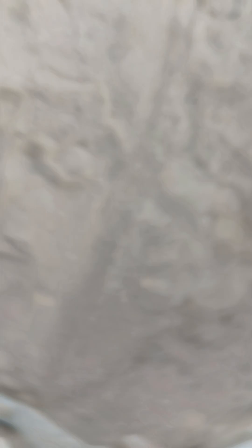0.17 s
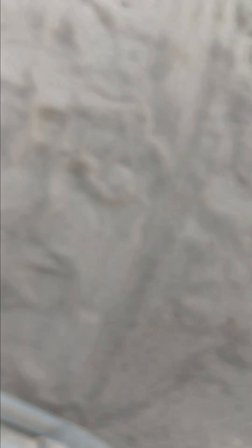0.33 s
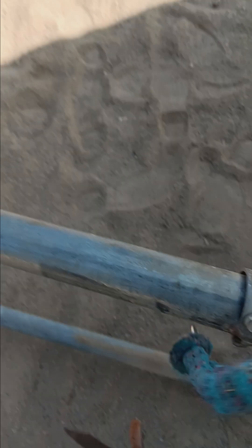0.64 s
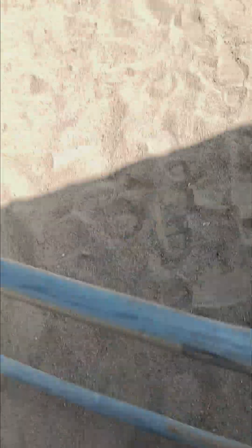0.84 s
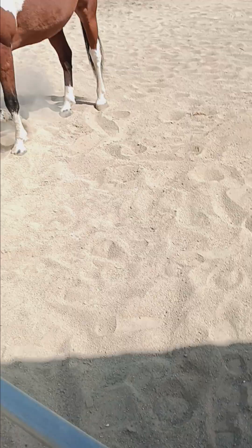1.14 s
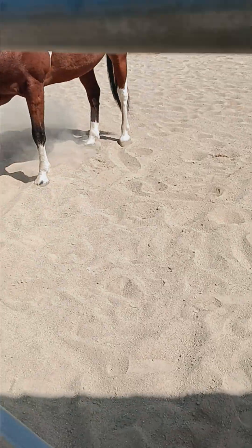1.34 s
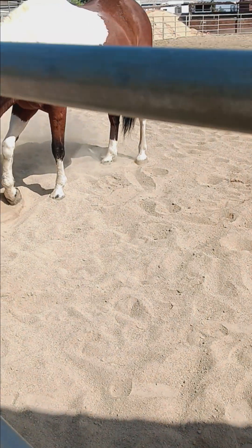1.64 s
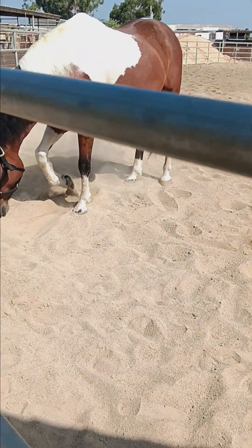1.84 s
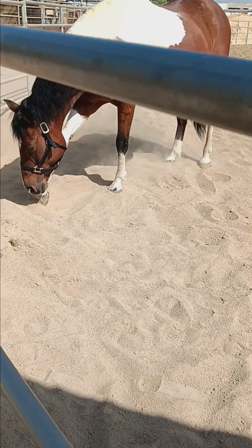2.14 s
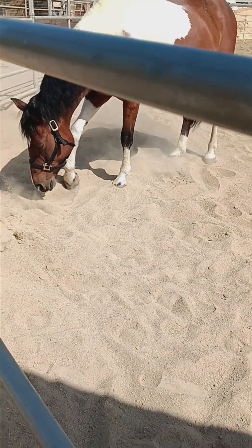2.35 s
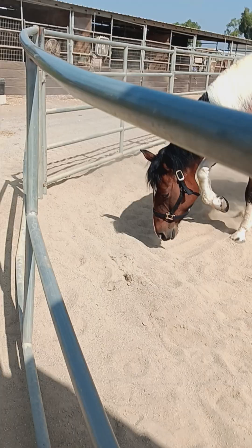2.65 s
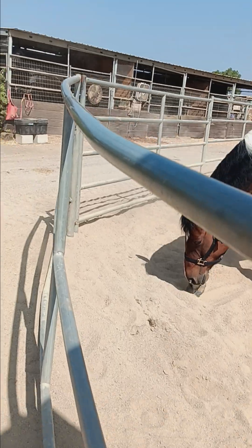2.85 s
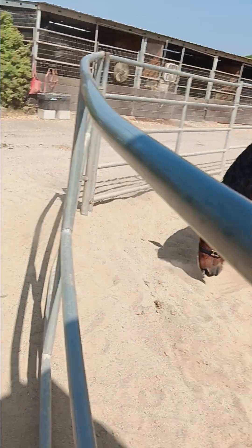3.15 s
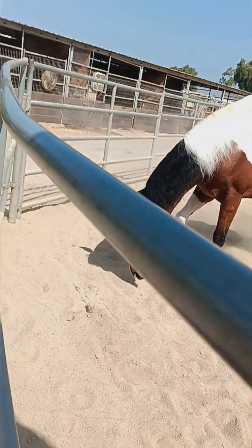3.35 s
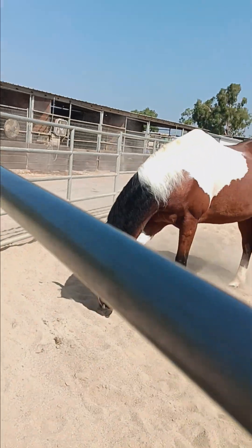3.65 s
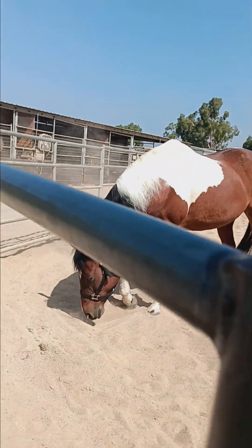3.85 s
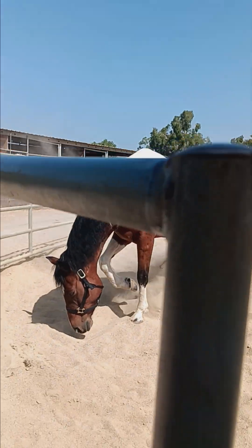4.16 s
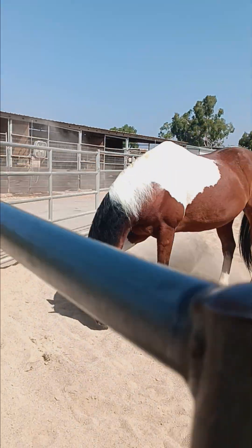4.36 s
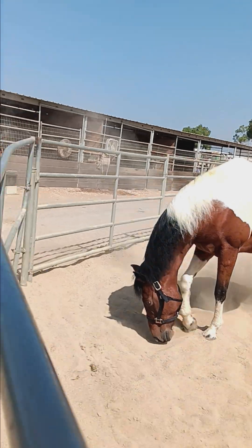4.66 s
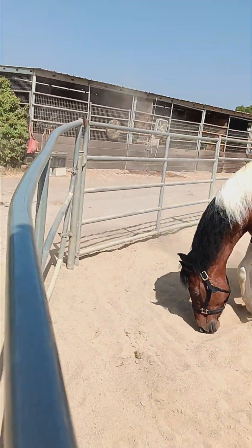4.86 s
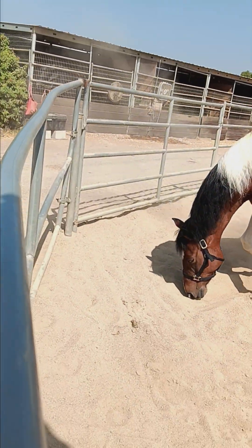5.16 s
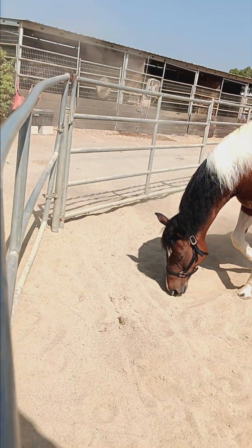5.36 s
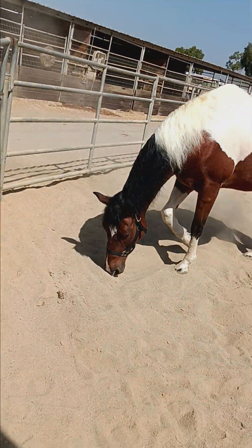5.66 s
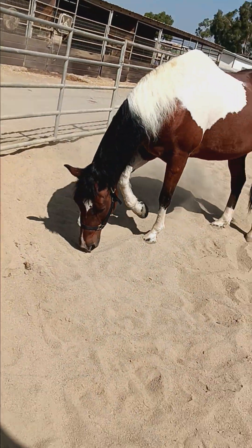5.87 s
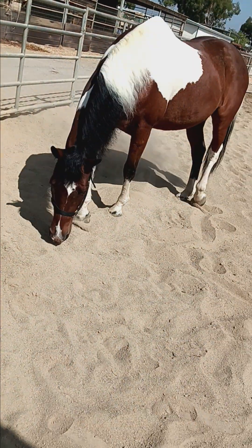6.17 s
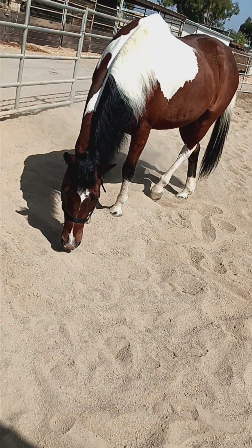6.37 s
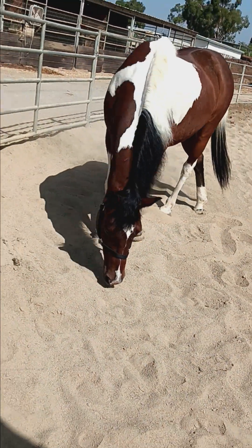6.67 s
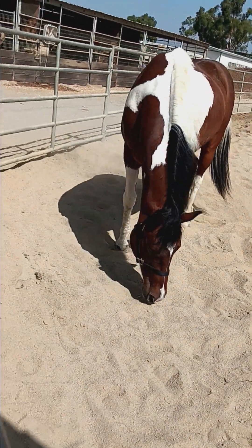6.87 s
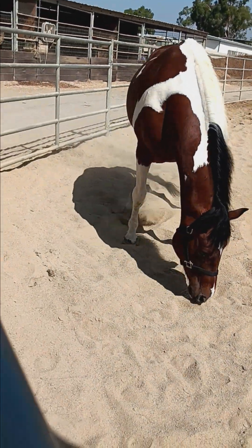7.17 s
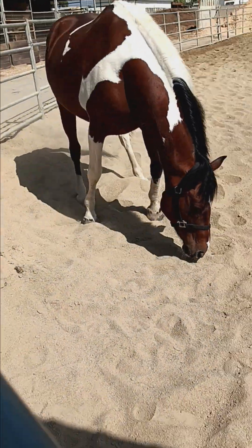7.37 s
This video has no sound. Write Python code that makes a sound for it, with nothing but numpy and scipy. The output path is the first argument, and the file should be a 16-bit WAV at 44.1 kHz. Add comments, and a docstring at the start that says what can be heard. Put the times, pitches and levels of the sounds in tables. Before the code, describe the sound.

A steel pipe gate and its latch clang sharply, then hands and feet scuff over sand before one huge ringing blow and a last clank.

```python
"""A steel pipe gate of a sand paddock clangs open: struck tubes and latch ring in modes, with a noisy clatter.
A snap hook pings as a caught sine, a low push goes with the heaviest blow; noise bursts tick, bump and fill out blows.
Hands and feet scuff as grainy noise over a low wind rumble, the noise hush of the yard, faint bands and one bird peep.
Two unlike microphones listen: the left one dull, strong and a millisecond late, the right one bright."""
import sys
import numpy as np
from scipy import signal
from scipy.io import wavfile
from scipy.ndimage import uniform_filter1d

SR = 44100
rng = np.random.default_rng(int(sys.argv[2]) if len(sys.argv) > 2 else 0)


def generate_wav(signal):
    """Clip the signal to [-1, 1] and save it as 16-bit WAV at the path in sys.argv[1]."""
    frames = np.transpose(np.atleast_2d(signal))
    scaled = np.clip(frames, -1, 1) * 32767
    pcm = np.round(scaled).astype(np.int16)
    wavfile.write(sys.argv[1], SR, pcm)


N = 331451  # samples in the scene


def gain_of(db):
    """Decibels to gain."""
    return 10 ** (np.asarray(db) / 20)


def evened(x):
    """Scales to rms 1."""
    return x / np.sqrt(np.mean(x ** 2) + 1e-20)


def read(points, hz):
    """Reads a table on a log-frequency axis."""
    table_hz, value = np.transpose(points)
    return np.interp(np.log(hz + 1), np.log(table_hz + 1), value)


def colour(points):
    """A steady noise spectrum read from a table."""
    return lambda hz, t: read(points, hz)


def bump(centre_hz, octaves):
    """A steady noise spectrum with one rounded peak."""
    return lambda hz, t: np.maximum(-6 * (np.log2((hz + 1) / centre_hz) / octaves) ** 2, -80)


def shares(pan_db):
    """Left and right gains for a left-over-right level in dB, total power kept."""
    left_power = 1 / (1 + gain_of(-2 * np.asarray(pan_db)))
    return np.sqrt(2 * np.array([left_power, 1 - left_power]))


def add(mix, start_s, sound):
    """Mixes a two-channel sound in at its start time."""
    part = mix[:, round(start_s * SR):][:, :sound.shape[1]]
    part += sound[:, :part.shape[1]]


# how much stronger the left microphone is: pitch_hz [Hz], left_over_right_db [dB]
MIC_BALANCE = [(300, 3.5), (1200, 8), (2500, 5.5), (5000, -2.5), (8000, -0.5), (10000, -23), (12000, -25),
               (16000, -26.5)]
# how much the two channels share the same noise: pitch_hz [Hz], likeness [0 to 1]
MIC_LIKENESS = [(30, .8), (120, .85), (500, 0.57), (1500, 0.48), (4000, 0.053), (12000, 0.16)]


def noise(count, size, level_db, patchy_db=0.):
    """Two partly alike noises, shaped over frequency and time, with drifting random patches."""
    hop = size // 4
    hz = np.fft.rfftfreq(size, 1 / SR)[:, None]
    t = np.arange(count // hop + 5) * hop / SR
    a, b, c, d, patches = rng.standard_normal((len(t), len(hz), 5)).T
    patches = uniform_filter1d(patches, size=4, axis=0)
    patches = evened(uniform_filter1d(patches, size=18, axis=1))
    alike = np.clip(read(MIC_LIKENESS, hz), 0, 1)
    left = a + 1j * b
    right = alike * left + np.sqrt(1 - alike ** 2) * (c + 1j * d)
    spectra = np.array([left, right])
    spectra *= shares(read(MIC_BALANCE, hz)) * gain_of(level_db(hz, t) + patchy_db * patches)
    return signal.istft(spectra, nperseg=size, noverlap=size - hop)[1][:, :count]


WAVER_DB, WAVER_PER_S = 3.5, 28  # loose joints make every mode waver by chance as it rings


def ring(t, pitches, modes, time_factor, tilt_db, pan_db):
    """Struck steel sings in many wavering modes, each beating with fainter close neighbours."""
    hz, (mode_db, t60_s) = np.array(pitches), np.transpose(modes)
    heights = gain_of(mode_db + tilt_db * np.log2(hz / 2500)) * shares(read(MIC_BALANCE, hz) + pan_db)
    chance = rng.random((len(hz), 4, 3, 1))
    wavers = rng.standard_normal((len(hz), 120))
    total = 0
    for f, height, fall_s, c, waver in zip(hz, heights.T, t60_s * time_factor, chance, wavers):
        main = np.sin(2 * np.pi * (f * t + c[0, :2]))
        # neighbouring tubes of nearly the same size beat against it and die sooner
        spread_hz = 70 + .03 * f
        kin = sum(np.sin(2 * np.pi * ((f + spread_hz * (k[2] - .5)) * t + k[:2])) for k in c[1:])
        tone = main + .4 * gain_of(-25 * t / fall_s) * kin
        tone *= gain_of(WAVER_DB * np.interp(t * WAVER_PER_S, np.arange(len(waver)), waver))
        # the joints damp the late ring harder
        fall_db = -60 * t / fall_s - 8.5 * t ** 3 - 13 * (t / fall_s) ** 2
        total = total + height[:, None] * gain_of(fall_db) * tone
    return total / np.linalg.norm(gain_of(mode_db))


BANDS_DB = 3.5  # the weak modes bunch, so the clatter is banded by chance
# how long the clatter rings, before each blow's clatter_time_factor: pitch_hz [Hz], t60_s [s]
CLATTER_FALL = [(300, 0.72), (1000, 0.24), (2500, 0.58), (5000, 0.37), (9000, 0.34), (15000, 0.17)]


def clatter(t, spectrum, time_factor, tilt_db):
    """Countless weaker modes merge into fading banded noise, opened by the crack of contact."""
    bands_db = BANDS_DB * rng.standard_normal((129, 1))

    def level_db(hz, u):
        tilted_db = read(spectrum, hz) + tilt_db * np.log2((hz + 50) / 2500)
        return bands_db + tilted_db - 60 * u / (read(CLATTER_FALL, hz) * time_factor)

    dense = noise(len(t), 256, level_db)
    crack = 1 + 1.7 * np.exp(-t / 0.0072)
    return dense * crack / np.std(dense[:, :400])


def blow(row, pitches, modes, spectrum):
    """A blow sets off clear modes and clatter; the hand on the tube sets the damping."""
    start_s, ring_db, clatter_db, ring_factor, clatter_factor, tilt_db, pan_db = row
    t = np.arange(int(1.6 * SR * min(ring_factor, 1))) / SR
    clear = gain_of(ring_db) * ring(t, pitches, modes, ring_factor, tilt_db, pan_db)
    dense = clatter(t, spectrum, clatter_factor, tilt_db)
    dense = gain_of(clatter_db) * shares(pan_db)[:, None] * dense
    rise = 1 - np.exp(-t / 0.00055)
    return start_s, rise * (clear + dense)


# All three sets of blows use these columns; the time factors scale the fall times:
# blows: start_s [s], ring_db [dB], clatter_db [dB], ring_time_factor, clatter_time_factor,
#        tilt_db [dB per octave], pan_db [dB, left over right]
# pitches: pitch_hz [Hz]
# modes: relative_db [dB], t60_s [s]
# clatter: pitch_hz [Hz], relative_db [dB]

# the gate's heaviest blows and two faint ones, ringing long and low: columns as above
LONG_STRIKES = [(5.215, -71, -43, 0.63, 1.13, -22, 4.5), (5.335, -59.5, -46, 0.92, 2.3, -15, 7),
                (5.904, 5.5, -1, 0.77, 0.85, 1.07, 13.5), (5.9135, -6.5, 0, 0.71, 0.59, 10, 6)]
LONG_PITCHES = [377, 460, 542, 618, 637, 690, 725, 935, 1193, 1255, 1292, 1489, 1567, 1591, 1687, 2243,
                2330, 2359, 2506, 2569, 2620, 2640, 2728, 3033, 3066, 4581, 6315, 6401, 6535, 6691]
LONG_MODES = [(-16, 2.72), (-22.5, 5.4), (-26, 4.1), (-16.5, 1.93), (-6.5, 0.2), (-17.5, 3.7), (-17, 2.4),
              (-10, 1.5), (2, 0.75), (-11.5, 1.1), (-6, 1.2), (-16, 0.57), (12.5, 0.71), (10.5, 0.82),
              (4, 0.83), (-1.5, 2.32), (4.5, 1.1), (-1, 1.82), (3, 0.47), (7.5, 0.88), (0.5, 1.2),
              (4.5, 0.93), (5.5, 0.85), (10, 0.78), (2, 0.99), (-17.5, 1), (-6, 0.73), (-18.5, 0.5),
              (7, 0.42), (-2, 0.46)]
LONG_SPECTRUM = [(150, -79), (250, -39.5), (373, -30.5), (651, -30), (831, -13), (955, -5.5), (1120, -33),
                 (1180, -14), (1610, -11), (2020, -23), (2320, -12.5), (5070, -21), (5900, -24),
                 (6700, -15), (7500, -21.5), (8600, -16), (10200, -16.5), (16000, -84)]


def gate_long_blows():
    """The gate's heaviest blows, and two faint ones, set off its long, low modes too."""
    return [blow(row, LONG_PITCHES, LONG_MODES, LONG_SPECTRUM) for row in LONG_STRIKES]


# the gate's other blows: strikes, mode pitches, modes and clatter spectrum, columns as above
GATE_STRIKES = [(0.081, -41.5, -53, 1.35, 1, -3.5, 4), (0.3301, -11, -15, 1.74, 0.98, 3, -0.5),
                (4.3245, -26, -35.5, 0.42, 0.6, -7, 9), (7.2574, -16, -15, 1.78, 1, 6, 7.5),
                (7.267, -18.5, -30.5, 1.64, 1, -6.5, -4.5)]
GATE_PITCHES = [669, 932, 1196, 1254, 1566, 1589, 1632, 1913, 2232, 2326, 2387, 2589, 2824, 2868, 3076,
                3160, 3247, 3290, 3357, 3424, 3892, 6319, 6398, 6563, 6625, 6689, 6925, 7233, 7713, 8240]
GATE_MODES = [(-11.5, 0.11), (-8, 0.81), (-5, 0.29), (0, 0.38), (9.5, 0.41), (-2.5, 0.25), (12, 0.078),
              (9.5, 0.31), (2, 1), (5.5, 0.87), (11.5, 0.2), (-2, 0.65), (-2.5, 0.75), (1.5, 0.25),
              (1.5, 0.26), (0, 0.44), (-14, 0.23), (4, 0.18), (7, 0.11), (2, 0.32), (-1.5, 0.23),
              (-2.5, 0.045), (8.5, 0.14), (-7, 0.21), (0.5, 0.14), (-3, 0.17), (-7.5, 0.34), (3, 0.16),
              (1.5, 0.14), (-3.5, 0.22)]
GATE_SPECTRUM = [(240, -56.5), (400, -21), (921, -16.5), (1110, -12.5), (1230, -8.5), (1460, -14.5),
                 (1580, 4), (1730, -14.5), (2290, -7), (5270, -16), (6540, -13), (12700, -24.5),
                 (16000, -45.5)]


def gate_blows():
    """The gate's steel tubes clang in shorter modes when struck."""
    return [blow(row, GATE_PITCHES, GATE_MODES, GATE_SPECTRUM) for row in GATE_STRIKES]


# the latch: blows, mode pitches, modes and clatter spectrum, columns as above
LATCH_STRIKES = [(1.2032, -3, -21, 1.03, 0.47, -0.59, 2.6), (1.222, -26.5, -27.5, 0.72, 0.83, .6, 2.22)]
LATCH_PITCHES = [1916, 2038, 2162, 2197, 2316, 2572, 2981, 3172, 3281, 3388, 3481, 3781, 4050, 5378, 5425,
                 5681, 5834, 5903, 6034, 9450, 9947, 10231]
LATCH_MODES = [(11, 0.23), (1, 0.2), (5.5, 0.36), (22, 0.12), (-7.5, 0.47), (1, 0.15), (-10, 0.224),
               (-25, 1.0), (-17, 1.0), (-5.5, 0.69), (-12.5, 1), (-12.5, 0.2), (-10.5, 0.31), (-7, 0.22),
               (-14.5, 0.42), (-18, 0.25), (3, 0.12), (-16, 0.21), (-6, 0.17), (-14, 0.51), (-8, 0.41),
               (-22, 0.32)]
LATCH_SPECTRUM = [(290, -73.5), (500, -54), (893, -23), (1480, -35), (1870, -22), (2230, -9), (2730, -18.5),
                  (3290, -14.5), (4800, -22), (5470, -16.5), (8330, -32.5), (9630, -17), (16000, -44)]


def latch():
    """The latch clangs in modes that start higher than the gate's."""
    return [blow(row, LATCH_PITCHES, LATCH_MODES, LATCH_SPECTRUM) for row in LATCH_STRIKES]


# a low push with the heaviest blow: level_db [dB], pitch_hz [Hz], pan_db [dB, left over right]
SHOVE_TONE = (8, 66, 20)
SHOVE_START_S, SHOVE_T60_S = 5.903, .06


def shove():
    """The heaviest blow shoves the microphones: a low, quickly fading sine."""
    level_db, pitch_hz, pan_db = SHOVE_TONE
    t = np.arange(6000) / SR
    push = -np.sin(2 * np.pi * pitch_hz * t)
    return SHOVE_START_S, gain_of(level_db - 60 * t / SHOVE_T60_S) * shares(pan_db)[:, None] * push


# the snap hook: level_db [dB], free_ring_s [s], caught_db [dB, against free], caught_t60_s [s]
HOOK_RING = (-9.5, .0085, -26, .1)
HOOK_START_S, HOOK_PITCH_HZ = 0.6785, 9770


def hook():
    """The snap hook sings freely for a moment, then is caught and nearly stilled."""
    level_db, free_s, caught_db, t60_s = HOOK_RING
    t = np.arange(6000) / SR
    held = np.clip((t - free_s) / 0.003, 0, 1)
    level = 1 - held + held * gain_of(caught_db - 60 * t / t60_s)
    level *= np.minimum(t / 0.0015, 1)  # soft start
    beat = 1 + 0.22 * np.cos(2 * np.pi * 420 * t)
    tone = np.sin(2 * np.pi * HOOK_PITCH_HZ * t)
    return HOOK_START_S, gain_of(level_db) * shares(-30.0)[:, None] * level * beat * tone


# short noise bursts: ticks, bumps and parts of the big blows:
# start_s [s], level_db [dB, 4.5 above the burst's rms before its fade], centre_hz [Hz],
# t60_s [s, at least 0.003], width [octaves], pan_db [dB, left over right]
BURST_EVENTS = [(0.081, -23, 6360, 0.01, 0.74, -15), (.303, -42, 3040, 0.28, 1.3, 8),
                (.331, -7.5, 3150, 0.22, 0.14, 4), (0.396, -25, 400, 0.085, 0.43, -7),
                (.54, -36, 855, 0.099, 0.45, 14), (0.68, -18.5, 4600, 0.026, 1.65, -1.5),
                (0.756, -21, 185, 0.045, 0.66, -7), (0.846, -29, 8200, 0.017, 0.53, -7),
                (0.8665, -35, 3500, 0.014, 1.4, 14), (1.395, -31.5, 890, 0.04, 1.6, 3),
                (1.568, -26, 350, 0.074, 2.3, 3), (1.668, -40.5, 3000, 0.037, 0.61, -2),
                (1.717, -31, 2440, 0.022, 1.44, -3), (2.085, -35.5, 9520, 0.029, 0.39, -3.5),
                (2.232, -21.5, 506, 0.035, 0.7, 5.5), (2.25, -24, 278, 0.11, .5, 5),
                (2.265, -24, 1480, 0.028, 4.6, -6), (2.292, -22, 900, 0.019, 1.05, 4),
                (2.317, -18, 710, 0.024, 1.3, -3), (2.579, -55, 6580, 0.15, 0.12, 12),
                (2.799, -37, 4980, 0.021, 1.06, 8), (2.823, -29.5, 895, 0.16, 0.36, -4),
                (2.865, -23, 600, .04, 0.52, -6), (2.914, -17.5, 240, 0.091, 0.37, 6),
                (2.982, -33, 3960, 0.066, 0.25, 7), (3.112, -16, 444, 0.03, 0.66, -9),
                (3.11, -29, 8000, 0.012, 0.53, -10.5), (3.4064, -23, 4060, 0.011, 0.78, -24),
                (3.311, -35, 1340, 0.038, 0.23, 3.5), (3.475, -23, 1028, 0.17, 0.79, 3.5),
                (3.598, -22, 1500, 0.052, 1.87, -6), (3.656, -33.5, 1190, 0.032, 0.85, 3),
                (3.764, -24.5, 690, 0.063, 1.1, 7), (3.865, -24, 466, 0.079, 0.29, -12.5),
                (4.191, -45.5, 4430, 0.16, 0.54, 13), (4.324, -22.5, 1564, 0.23, 0.49, 8.5),
                (4.3662, -13.5, 6200, 0.026, 1.1, 1), (4.37, -24.5, 150, 0.023, 1.6, 23),
                (4.764, -48.5, 2800, 0.27, 0.2, 6.5), (4.775, -38.5, 1464, 0.38, 0.27, 9),
                (5.335, -56, 2670, 0.13, 0.077, 6), (5.34, -50, 2100, 0.28, 0.058, 9),
                (5.801, -37.5, 8000, 0.053, 1.3, 6), (5.905, 1.5, 411, 0.1, 0.68, 24),
                (6.329, -52.5, 9800, 0.17, 0.16, -6), (6.437, -36.5, 6700, 0.16, 0.069, 24),
                (7.214, -18.5, 473, 0.029, 0.79, -15), (7.2115, -34.5, 5300, 0.056, 0.36, -6),
                (7.2555, -13, 4100, 0.1, 0.11, -2), (7.44, -18, 438, 0.0098, 0.33, 16)]


def burst(row):
    """A tick, a bump or part of a big blow: a fading noise burst around one pitch region."""
    start_s, level_db, centre_hz, t60_s, octaves, pan_db = row
    t = np.arange(7000) / SR
    band = evened(noise(len(t), 512, bump(centre_hz, octaves)))
    shape = gain_of(-60 * t / max(t60_s, .003)) * np.minimum(t / 0.0004, 1)
    return start_s, gain_of(level_db - 4.5) * shares(pan_db)[:, None] * band * shape


# scuffs of hands and feet: full_strength_s [s], swell_s [s], hold_s [s], hiss_db [dB],
# scrape_db [dB, against hiss], crunch_db [dB, against hiss], pan_db [dB, left over right]
SCUFF_EVENTS = [(0.028, 0.037, 0.041, -44.5, 3, 13, -1.5), (0.663, 0.06, 0.0099, -47, 2.5, -26, 0),
                (0.728, .005, .015, -50.5, 0, 0, -19), (0.841, .02, .008, -51.5, 4, -15, 6),
                (0.865, .004, 0.0064, -37.5, 2, -38, 2.5), (1.38, 0.0078, 0.015, -50.5, -1.5, -1, -6),
                (1.525, 0.023, 0.0077, -42.5, 1.5, 4, 1.5), (1.559, 0.0062, 0.0058, -43, 2.5, 17.5, -1),
                (2.086, .004, 0.011, -46.5, -16, -20.5, 0.5), (2.237, 0.033, 0.037, -39, -3, 11.5, 1.5),
                (2.296, 0.0037, 0.014, -37, -9.5, 9.5, -0.5), (2.545, .003, .003, -62, -11, -7, -2),
                (2.572, .004, 0.027, -55, -13.5, -8.5, -6), (2.799, .003, 0.0042, -46.5, -12, -8, 0.5),
                (2.823, 0.0081, 0.003, -41.5, -5, 3.5, 1.5), (2.889, 0.034, 0.045, -45.5, -1.5, 14, 0.5),
                (2.978, 0.011, .003, -48.5, -2, -8, -3), (3.011, .004, 0.018, -39.5, -1.5, 9, 0.5),
                (3.09, 0.024, .012, -52, -5, 14.5, -21), (3.332, 0.066, 0.0063, -50, -15, -8.5, 7.5),
                (3.392, .004, 0.036, -57.5, 0.5, 10, -11.5), (3.478, 0.017, 0.018, -41, 5.5, -13, 8.5),
                (3.535, 0.0064, .002, -59.5, 9.5, -1, 14), (3.598, 0.0067, .002, -41, -4, 10.5, 1.5),
                (3.663, 0.027, 0.072, -44, 0, 10, 3), (3.763, 0.012, 0.0032, -40.5, 2, 14, 2.5),
                (3.832, 0.013, .025, -55.5, -5, 4, -2.5), (3.965, 0.011, .003, -53, -17, -22.5, 12),
                (4.197, 0.027, 0.0019, -54, -16, -16.5, 10.5), (4.369, 0.0051, 0.0024, -38, -8, -7, 1),
                (4.43, 0.03, .05, -49, 1, 7, 2), (4.51, .04, .04, -47, 2, 12, 1),
                (4.604, 0.0098, 0.028, -59, -11, -3, 2), (6.71, .015, 0.046, -64.5, -2, 5, -6.5),
                (6.821, 0.061, .004, -55, -22, -1, 9), (6.927, .03, 0.079, -62, -9, 6, -3),
                (7.133, .006, 0.038, -53, -19.5, -3.5, 3), (7.347, 0.12, 0.13, -38.5, -2, 0.5, 1)]
SWELL_DB, FALL_DB_PER_S, SAG_DB_PER_S = 18.5, 652, 28  # a scuff swells, sags while held, then falls away


def strokes():
    """Each scuffing stroke swells, holds and falls: levels of hiss, scrape and crunch in both channels."""
    t = np.arange(N) / SR
    levels = np.zeros((3, 2, N))
    for start_s, swell_s, hold_s, hiss_db, scrape_db, crunch_db, pan_db in SCUFF_EVENTS:
        on = np.flatnonzero((t >= start_s - swell_s) & (t < start_s + hold_s + 60 / FALL_DB_PER_S))
        u = t[on] - start_s
        shape_db = SWELL_DB * np.minimum(u, 0) / swell_s
        shape_db -= SAG_DB_PER_S * np.clip(u, 0, hold_s)
        shape_db -= FALL_DB_PER_S * np.maximum(u - hold_s, 0)
        stroke = gain_of(hiss_db + shape_db) * shares(pan_db)[:, None]
        levels[:, :, on] += stroke * gain_of([0, scrape_db, crunch_db])[:, None, None]
    return levels


# the three scuff colours, high, middle and low: pitch_hz [Hz], relative_db [dB]
HISS_SPECTRUM = [(2650, -31), (4500, -10.5), (4980, -6.5), (5620, -11.5), (6630, -2), (7260, -7.5),
                 (10000, 2.5), (16000, -27)]
SCRAPE_SPECTRUM = [(1000, -27), (1700, 7), (2170, 4), (3180, -0.5), (3480, 2), (4290, -0.5), (4800, -2.5),
                   (6240, -0.5), (10600, -120)]
CRUNCH_SPECTRUM = [(88, -26), (150, -5.5), (274, -11), (670, -10), (767, -14.5), (1040, -16.5), (1290, -16),
                   (1620, -24), (1800, -21.5), (2340, -85), (3960, -120)]


def scuffs(levels):
    """Sand and skin rub in clumps of grains: a hiss above, a scrape in the middle, a crunch below."""
    fade = gain_of(-60 / (.25 * SR))  # loose sand settles after each stroke
    levels = levels + 0.23 * signal.lfilter([1 - fade], [1, -fade], levels)
    strengths = gain_of(3.4 * np.minimum(rng.exponential(1, N), 4))
    grains = strengths * (rng.random(N) < 300 / SR)  # about 300 grains a second
    clumps = evened(1 + 0.19 * evened(signal.lfilter([1], [1, -.985], grains)))
    rub = 0
    for level, spectrum in zip(levels, (HISS_SPECTRUM, SCRAPE_SPECTRUM, CRUNCH_SPECTRUM)):
        rub = rub + level * evened(noise(N, 512, colour(spectrum), patchy_db=2.5))
    return clumps * rub


# the wind rumble's course, before its random wobble: time_s [s], level_db [dB], pan_db [dB, left over right]
WIND_COURSE = [(0, -37, 7), (.2, -42.5, 6.5), (.6, -38, 6.5), (.77, -33, 2.5), (.88, -44, 6),
               (1.3, -39.5, 5.5), (1.9, -39, 7.5), (2.13, -44, 4.5), (2.449, -38, 7), (2.68, -41, 6),
               (3.05, -35.5, 7), (3.12, -31, -5), (3.2, -40, 5.5), (3.58, -37, 7), (3.66, -20.5, 19),
               (3.92, -30.5, 13), (3.97, -40.5, 6.5), (4.3, -37.5, 6.5), (5.4, -40, 5.5), (5.86, -43, 8.5),
               (6.05, -43, 5), (6.3, -37.5, 6.5), (6.6, -41, 7.5), (7.515, -43, 6)]
# the wind's low spectrum: pitch_hz [Hz], relative_db [dB]
WIND_SPECTRUM = [(11, -46.5), (18, -11.5), (38, -1.5), (58, 1), (70, 2), (81, 4), (97, -3.5), (133, 0),
                 (177, -16), (208, -19.5), (241, -26), (291, -31), (350, -27), (460, -51.5), (770, -120)]
WOBBLE_DB, WOBBLE_PER_S = 3.5, 14  # random level wobble of the low rumble
SHAKE_DB, SHAKE_S = 0.5, 0.047  # rumble against crunch, and the span over which the shake is smoothed


def wind(crunch):
    """Wobbling low rumble, mostly leaning left, that swells when a scuff's crunch shakes the microphones."""
    time_s, level_db, pan_db = np.transpose(WIND_COURSE)
    t = np.arange(N) / SR
    rumble = noise(N, 4096, colour(WIND_SPECTRUM), patchy_db=0.5)
    rumble /= rumble.std(axis=1, keepdims=True)
    knots = np.arange(0, t[-1] + 1, 1 / WOBBLE_PER_S)
    wobble_db = WOBBLE_DB * np.interp(t, knots, rng.standard_normal(len(knots)))
    level = gain_of(np.interp(t, time_s, level_db) + wobble_db) * shares(np.interp(t, time_s, pan_db))
    shake = gain_of(SHAKE_DB) * uniform_filter1d(crunch, size=round(SHAKE_S * SR), axis=1)
    return np.hypot(level, shake) * rumble


# the yard's course: time_s [s], drone_db [dB], air_db [dB]
YARD_COURSE = [(0, -41.5, -43), (.2, -57, -67), (.6, -50.5, -58), (.8, -56.5, -58.5), (1.149, -57, -68.5),
               (1.7, -56.5, -64.5), (2.002, -61.5, -68.5), (2.4, -57.5, -72), (3.0, -59.5, -67),
               (3.5, -56, -66.5), (3.9, -64, -66), (4.5, -53.5, -70), (4.8, -51, -63), (5.0, -58.5, -72.5),
               (5.2, -54, -67.5), (5.451, -44, -70.5), (5.7, -57, -69.5), (6.498, -51, -62.5),
               (6.8, -56.5, -80), (7.1, -55, -65.5), (7.515, -43, -45)]
# the yard's drone and airy hiss: pitch_hz [Hz], relative_db [dB]
DRONE_SPECTRUM = [(120, -34.5), (200, -4.5), (275, -19.5), (315, -32), (408, -11), (536, -26), (753, -17),
                  (1120, -21), (1240, -14.5), (3000, -44.5), (3900, -72), (6600, -120)]
AIR_SPECTRUM = [(1470, -43), (2500, -2), (3490, -3.5), (4990, -3), (5920, -2.5), (6860, -11.5), (9660, 2),
                (11500, -14), (12300, -27), (16000, -27.5)]


def yard():
    """A far drone, mostly on the left, and a faint airy hiss that flickers, both patchy noise."""
    time_s, drone_db, air_db = np.transpose(YARD_COURSE)
    t = np.arange(N) / SR
    drone = evened(noise(N, 1024, colour(DRONE_SPECTRUM), patchy_db=7.0)) * shares(5.)[:, None]
    air = evened(noise(N, 512, colour(AIR_SPECTRUM), patchy_db=5.5)) * shares(3.)[:, None]
    return gain_of(np.interp(t, time_s, drone_db)) * drone + gain_of(np.interp(t, time_s, air_db)) * air


# faint narrow bands, one of them (3190 Hz) the latch ringing on:
# start_s [s], end_s [s], centre_hz [Hz], width [octaves], level_db [dB]
FAINT_BANDS = [(0.811, 1.228, 1500, 0.094, -52.5), (0.911, 1.12, 1040, 0.064, -62.5),
               (1.224, 1.582, 3190, .05, -51), (1.981, 2.232, 1404, 0.034, -61),
               (2.72, 2.815, 450, .2, -50.5), (2.846, 2.96, 3430, .16, -43),
               (3.174, 3.304, 9900, 0.13, -57.5), (5.584, 5.881, 1390, 0.14, -58),
               (6.128, 6.494, 4600, 0.07, -62)]


def faint_band(row):
    """A narrow band of noise, panned left, swells and fades."""
    start_s, end_s, centre_hz, octaves, level_db = row
    count = int((end_s - start_s) * SR)
    band = evened(noise(count, 2048, bump(centre_hz, octaves)))
    return start_s, gain_of(level_db) * shares(9.3)[:, None] * band * signal.windows.tukey(count, .6)


# the bird's glide: time_s [s], pitch_hz [Hz], level_db [dB]
PEEP_GLIDE = [(2.7, 7350, -63), (2.73, 7340, -52.5), (2.792, 7320, -65), (2.81, 7205, -63)]


def peep():
    """The bird gives one thin whistle, a gliding sine."""
    time_s, pitch_hz, level_db = np.transpose(PEEP_GLIDE)
    t = np.arange(time_s[0], time_s[-1], 1 / SR)
    tone = np.sin(2 * np.pi * np.cumsum(np.interp(t, time_s, pitch_hz)) / SR)
    tone *= signal.windows.tukey(len(t), .2)
    level = np.sqrt(2) * gain_of(np.interp(t, time_s, level_db))
    return time_s[0], level * tone * shares(0.1)[:, None]


def scene():
    """All sources at the two microphones."""
    levels = strokes()
    mix = wind(levels[2]) + yard() + scuffs(levels)
    events = gate_long_blows() + gate_blows() + latch() + [shove(), hook(), peep()]
    events += [burst(row) for row in BURST_EVENTS]
    events += [faint_band(row) for row in FAINT_BANDS]
    for start_s, sound in events:
        add(mix, start_s, sound)
    return mix


LAG_SAMPLES, EDGE_HZ = 40, 16400  # how late the left channel is, and the upper band limit
DUCK_ABOVE_DB, RECOVERY_DB_PER_S = -9.0, 74.0


def record(dry):
    """The left channel comes late; one gain control ducks both when loud; clipping; band limit."""
    late = np.array([np.roll(dry[0], LAG_SAMPLES // 2), np.roll(dry[1], -LAG_SAMPLES // 2)])
    power = abs(uniform_filter1d((late ** 2).max(0), size=300))
    power_db = 10 * np.log10(power + 1e-12)
    fall_db = np.arange(N) * RECOVERY_DB_PER_S / SR
    held_db = np.maximum.accumulate(power_db + fall_db) - fall_db  # jumps up, falls back steadily
    over_db = np.maximum(held_db - DUCK_ABOVE_DB, 0)
    duck_db = 0.91 * uniform_filter1d(over_db, size=100)
    clipped = np.clip(late / gain_of(duck_db), -1, 1)
    lowpass = signal.firwin(801, EDGE_HZ, window=("kaiser", 11), fs=SR)
    return signal.oaconvolve(clipped, lowpass[None], "same")


dry = scene()
out = record(dry)
generate_wav(out)
```